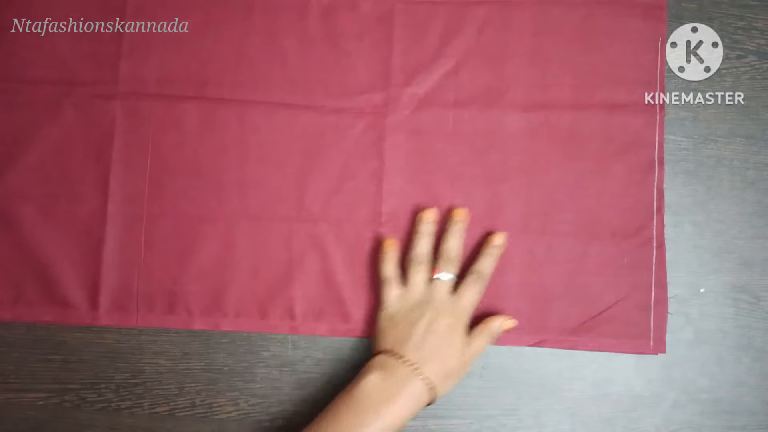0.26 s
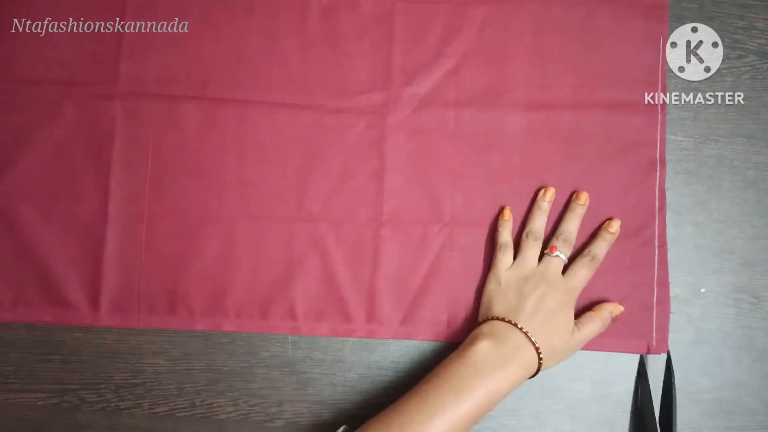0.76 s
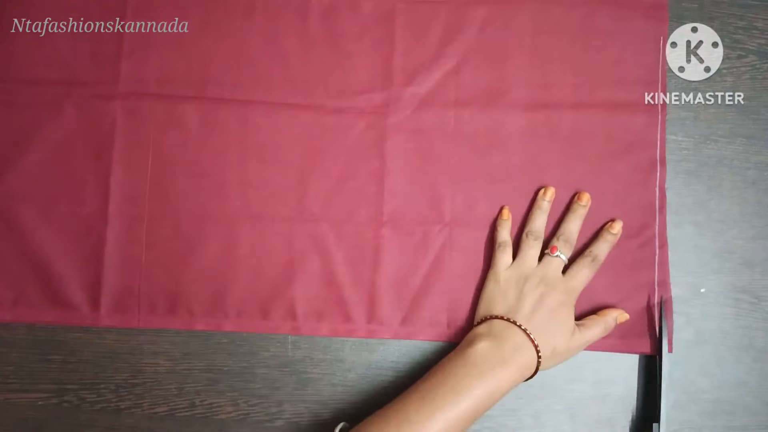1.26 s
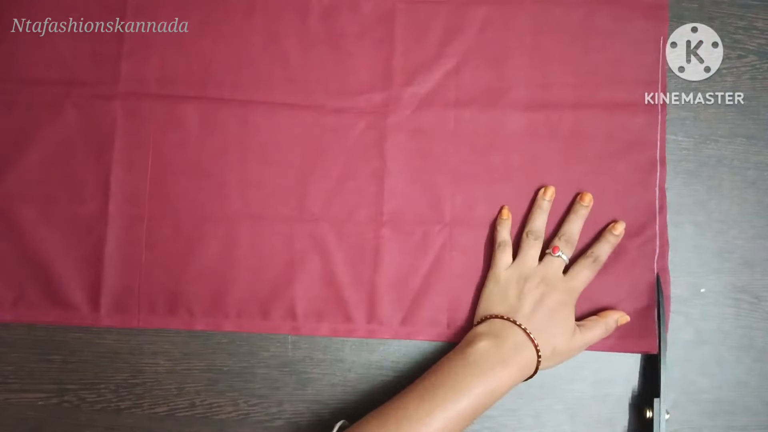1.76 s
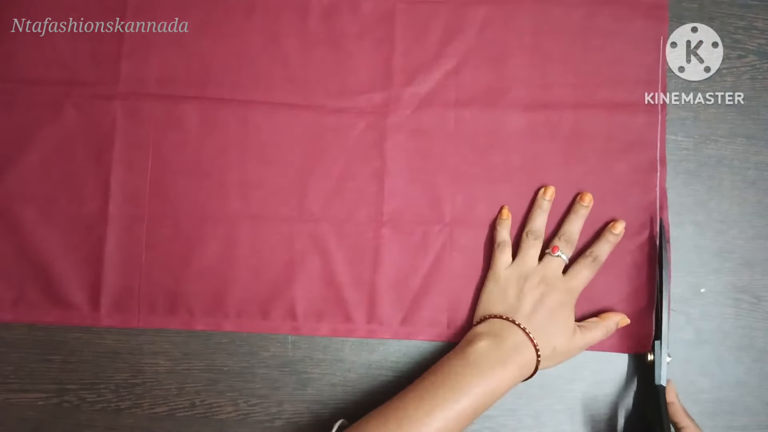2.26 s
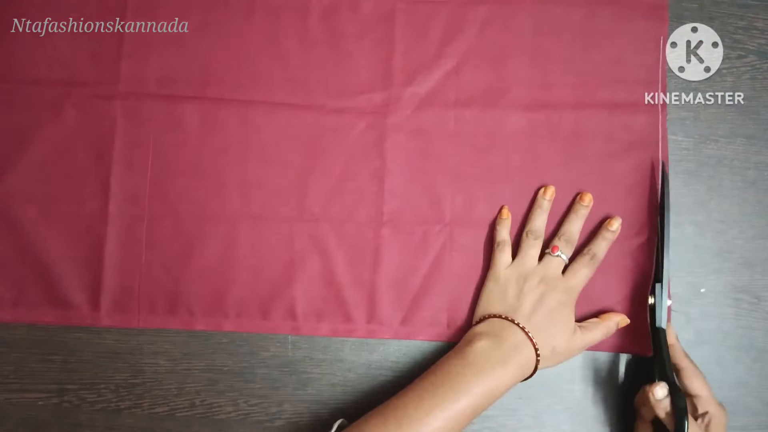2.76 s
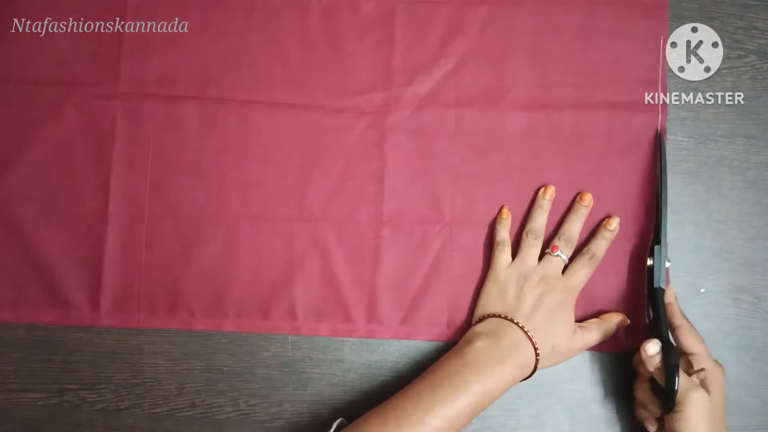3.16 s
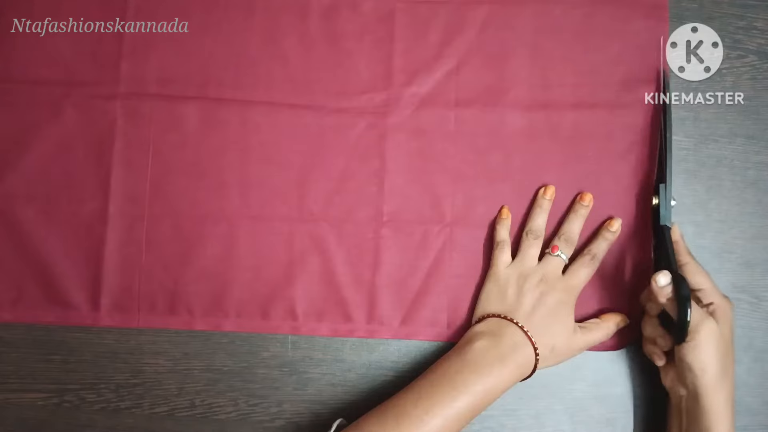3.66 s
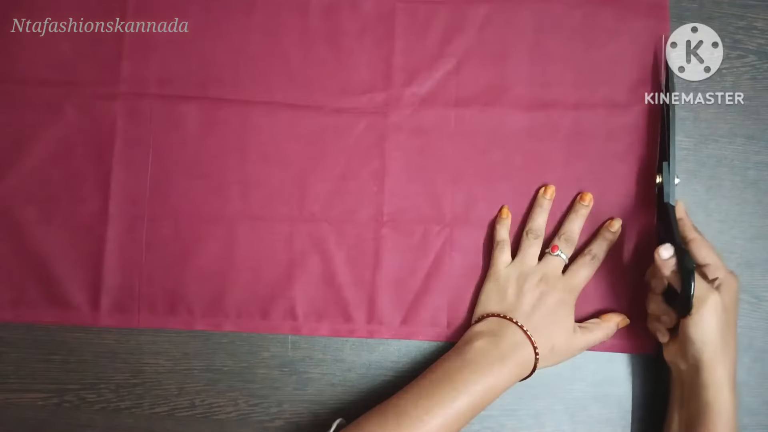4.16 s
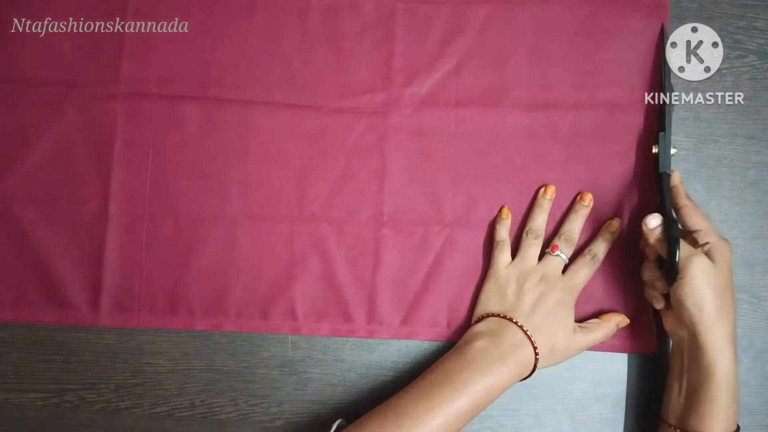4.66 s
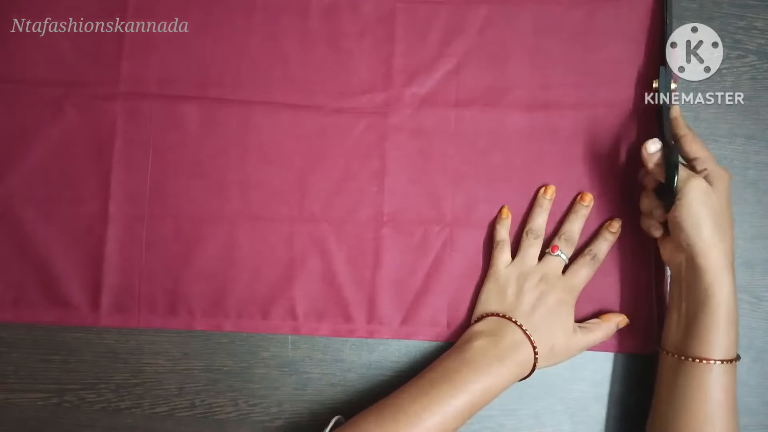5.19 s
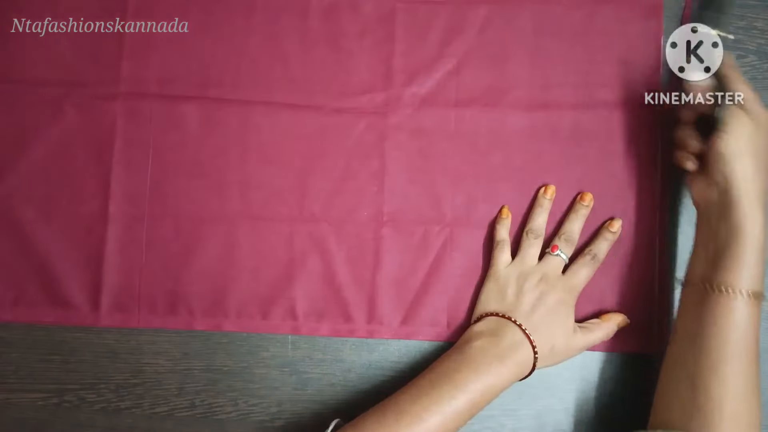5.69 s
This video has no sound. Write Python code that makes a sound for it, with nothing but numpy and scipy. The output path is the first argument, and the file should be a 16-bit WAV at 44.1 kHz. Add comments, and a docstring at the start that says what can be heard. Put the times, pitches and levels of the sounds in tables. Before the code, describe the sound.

Heavy steel shears clink sharply a few times, knock on a wooden table and slide with a short scrape and rustle under cloth. After a brief pause they cut along the edge, about fifteen even crunching snips, each with a bright thread rasp and a soft rub as the blades reopen. Ends with a small metallic scrape. Close stereo microphones, small hard-walled room, faint hush.

```python
"""Tailor's shears cutting cloth on a table

Heavy shears clink as they are picked up, are set on a table and slid under a sheet of cloth, then cut
along its edge in a small, hard-walled room, before a microphone pair. Clinks are decaying steel modes;
stick-slip snaps drive the resonances of table and blades; parting threads give a bright rasp, the
dragging handle short wavering groans. Each closing stroke crunches, each opening rubs softly."""
import sys
import numpy as np
from scipy import signal
from scipy.fft import rfft, irfft
from scipy.io import wavfile
from scipy.ndimage import uniform_filter1d

SR = 44100
rng = np.random.default_rng(int(sys.argv[2]) if len(sys.argv) > 2 else 0)


def wav_out(sig):
    """Save sig, one row per channel (or a flat mono array), as 16-bit PCM at SR to the path in sys.argv[1]."""
    wavfile.write(sys.argv[1], SR, np.round(np.clip(np.atleast_2d(sig).T, -1, 1) * 32767).astype(np.int16))


N = 261745
TIME = np.arange(N) / SR

# Shears sliding over table and cloth. Each row: start in seconds, length in seconds, then the levels
# of table, blades and cloth in dB.
SLIDES = [(0.272, 0.1, -84, -59.5, -76), (0.411, 0.11, -83.5, -71, -74.5), (0.583, 0.012, -68, -94, -57.5),
          (0.64, 0.011, -76, -90, -85), (0.73, 0.057, -121, -104, -70.5), (0.808, 0.054, -54, -48.5, -44),
          (0.983, 0.044, -85, -87, -74.5), (1.092, 0.0064, -83.5, -67, -66.5),
          (1.286, 0.015, -85, -63.5, -62), (1.338, 0.051, -63, -52.5, -52), (1.556, 0.0075, -75, -51, -68),
          (1.925, 0.019, -63, -60, -53.5), (2.226, 0.032, -77, -71.5, -62.5),
          (4.594, 0.024, -74, -63.5, -61), (5.6, 0.016, -92, -71, -65), (5.714, 0.021, -50.5, -53.5, -55.5),
          (5.77, 0.021, -53, -48.5, -54), (5.813, 0.079, -62, -60.5, -105)]
# Cuts: the edges touch, bite through the cloth and open again. Each row: bite in seconds, length in
# seconds, blade body in dB, blade ring in dB, touch in seconds before the bite, opening in seconds after it.
CUTS = [(1.41, 0.057, -38, -42, 0.023, 0.14), (1.783, 0.054, -40.5, -42, 0.021, 0.12),
        (2.096, 0.066, -46, -45, 0.0066, 0.11), (2.385, 0.048, -44, -43, 0.01, .12),
        (2.672, 0.053, -44, -40.5, 0.0095, 0.14), (2.958, 0.056, -45, -43, 0.018, 0.12),
        (3.217, 0.063, -44, -43, 0.018, 0.13), (3.502, 0.051, -43, -40.5, 0.011, 0.12),
        (3.776, 0.05, -43.5, -39, 0.015, 0.12), (4.052, 0.034, -45, -42, 0.026, 0.1),
        (4.437, 0.049, -50.5, -41.5, 0.024, .115), (4.717, 0.067, -45, -41.5, 0.011, 0.13),
        (4.996, 0.047, -43.5, -40.5, .016, .11), (5.261, 0.04, -42, -44.5, 0.027, 0.11),
        (5.512, 0.037, -44, -44, 0.025, 0.089)]
# Spectrum of a steel crack and of sliding cloth. Each row: frequency in Hz, relative density in dB per Hz.
CRACK_SPECTRUM = [(100, -42), (300, -17), (540, -27.5), (750, -8), (1600, -9.5), (2800, 0), (4100, -0.5),
                  (5100, 4), (6800, -4.5), (10000, -4.5), (13000, -2), (16000, -2)]

# course of a movement: (attack s per 60 dB, sag while it lasts dB, release s per 60 dB)
SLIDE_COURSE = (0.07, 0, 0.036)
OPEN_COURSE = (0.074, 6.36, 0.1)
OPEN_S = 0.028  # length of each opening


def from_db(db):
    """Decibels to gain."""
    return 10 ** (np.asarray(db) / 20)


def at_hz(points, hz):
    """Read a table on a log-frequency axis."""
    f, value = np.transpose(points)
    return np.interp(np.log(np.maximum(hz, 1)), np.log(f), value)


def unit(response):
    """Scale a response to energy 1 per channel, averaged over the channels."""
    return response / np.sqrt(np.mean(np.sum(response ** 2, axis=-1)) + 1e-30)


def through(x, response):
    """Play x through an impulse response."""
    return signal.fftconvolve(np.atleast_2d(x), np.atleast_2d(response), axes=-1)[:, :N]


def colour(points, size=2048):
    """Causal (minimum-phase) response with the given spectrum."""
    cepstrum = irfft(np.log(from_db(at_hz(points, np.fft.rfftfreq(size, 1 / SR)))))
    # fold the cepstrum onto positive times
    cepstrum[1:size // 2] *= 2
    cepstrum[size // 2 + 1:] = 0
    return irfft(np.exp(rfft(cepstrum)))


def strokes(starts, lengths, levels_db, course):
    """Force of a set of movements: each rises, sags while it lasts and is released."""
    attack_s, sag_db, release_s = course
    power = np.zeros(N)
    for start, length, db in zip(*np.broadcast_arrays(starts, lengths, levels_db)):
        end = length + release_s
        near = slice(max(int((start - attack_s) * SR), 0), int((start + end) * SR))
        corners_s = [-attack_s, 0, length, end]
        shape_db = np.interp(TIME[near] - start, corners_s, [-60, 0, -sag_db, -sag_db - 60])
        power[near] += from_db(db + shape_db) ** 2
    return np.sqrt(power)


def handling(rows, course, axis):
    """Force of slides or bumps, with the levels of one column."""
    columns = np.transpose(rows)
    return strokes(columns[0], columns[1], columns[axis], course)


def cutting(touch_db, bite_db, open_db):
    """Force on one part through every cut: touch, closing stroke, opening."""
    bite_s, length, _, _, lead, reopen = np.transpose(CUTS)
    # the hand opens the blades more briskly as it gets going: 0.7 dB per second
    growth_db = 0.7 * (bite_s - bite_s.mean())
    touch = strokes(bite_s - lead, 0.017, touch_db, (0.03, 3.8, 0.096))
    crunch = strokes(bite_s, length, bite_db, (0.022, 5, 0.077))
    opening = strokes(bite_s + reopen, OPEN_S, open_db + growth_db, OPEN_COURSE)
    return touch + crunch + opening


def grains(per_s, spread_db, even_s=.012):
    """Tiny snaps of uneven size over faint noise; their power is even over longer stretches."""
    sizes = from_db(spread_db * np.minimum(rng.exponential(1, N), 4)) * rng.choice([-1, 1], N)
    snaps = sizes * (rng.random(N) < per_s / SR) + 0.037 * rng.standard_normal(N)
    return snaps / np.sqrt(uniform_filter1d(snaps ** 2, int(even_s * SR) + 1) + 1e-9)


def taps(rows, axis, length_s):
    """One click a row, with the energy that its level has over length_s."""
    out = np.zeros(N)
    for row in rows:
        out[max(round(row[0] * SR), 0)] += from_db(row[axis]) * np.sqrt(length_s * SR)
    return out


def struck(modes):
    """Free ringing after one blow: decaying modes of random sign; thin steel radiates no bass."""
    t = TIME[:SR // 2]
    rings = 0
    for hz, db, t60 in modes:
        decay = from_db(db - 60 * t / t60)
        rings = rings + rng.choice([-1, 1]) * decay * np.cos(2 * np.pi * hz * t)
    no_bass = signal.butter(2, modes[0][0] / 2, "high", fs=SR, output="sos")
    return unit(signal.sosfilt(no_bass, rings))


def body(force, modes, wander_db, wander_s=.1):
    """Resonances whose shares wander as the point of contact travels; dark below and above them."""
    t = TIME[:SR // 2]
    rings = []
    for k, (hz, width, db) in enumerate(modes):
        decay = from_db(db) * width * np.exp(-np.pi * width * t)
        rings.append((-1) ** k * decay * np.cos(2 * np.pi * hz * t))
    edges_hz = [modes[0][0] * 0.63, modes[-1][0] * 1.04]
    rings = signal.sosfilt(signal.butter(3, edges_hz, "band", fs=SR, output="sos"), rings)
    knots = rng.standard_normal((len(modes), 256))
    shares = np.array([from_db(wander_db * np.interp(TIME / wander_s, np.arange(len(k)), k)) for k in knots])
    shares /= np.sqrt(np.mean(shares ** 2, axis=0))
    whole = rings.sum(axis=0)
    scale = np.linalg.norm(whole)
    return through(force * shares, rings / scale).sum(axis=0), whole / scale


def friction(force, modes, per_s, spread_db, even_s, wander_db):
    """Stick-slip snaps drive a body; the steady hand keeps its vibration near the level of the stroke."""
    shaken, response = body(force * grains(per_s, spread_db), modes, wander_db)
    steady = np.abs(through(force ** 2, response ** 2)[0])
    window = np.hanning(int(even_s * SR) + 3)
    powers = np.array([steady, shaken ** 2])
    expected, actual = np.abs(signal.fftconvolve(powers, window[None], "same", axes=-1)) + 1e-12
    return shaken * np.sqrt(expected / actual)


def room(wet_db, early_t60, late_db):
    """Direct sound, a quick cloud of near reflections and a longer tail; width varies with frequency."""
    # Width at the microphone pair. Each row: frequency in Hz, side against mid in dB.
    side_to_mid = [(100, -0.5), (250, -8), (500, -3.5), (1200, -3), (2300, 2), (15000, -1.5)]
    # Decay of the late tail. Each row: frequency in Hz, time to fall by 60 dB in seconds.
    late_t60 = [(150, 0.78), (1000, 0.22), (4000, 0.38), (9000, 0.33), (15000, 0.32)]
    t = TIME[:SR // 2]
    hz = np.fft.rfftfreq(len(t), 1 / SR)
    mid, side = rfft(rng.standard_normal((2, len(t))))
    width = from_db(at_hz(side_to_mid, hz))
    field = (mid + width * side * [[1], [-1]]) / np.sqrt(1 + width ** 2)
    edges = [0, 500, 1500, 3500, 7000, 11000, SR]
    tail = 0
    for low, high in zip(edges, edges[1:]):
        early = from_db(-60 * t / early_t60)
        late = from_db(late_db - 60 * t / at_hz(late_t60, (low + high) / 2))
        tail = tail + irfft(field * ((hz >= low) & (hz < high)), len(t)) * (early + late)
    response = from_db(wet_db) * unit(tail * np.clip(t / 0.0024, 0, 1))
    response[:, 0] += 1  # direct sound
    return unit(response)


def in_room(x, wet_db, early_t60, late_db, count=4):
    """The shears keep moving, so the sound crossfades round a few patterns of reflections."""
    out, travel = 0, TIME / .27  # one pattern every 0.27 s
    for k in range(count):
        away = np.abs((travel - k + count / 2) % count - count / 2)
        share = np.sqrt(np.clip(1.5 - 2 * away, 0, 1))
        out = out + through(x * share, room(wet_db, early_t60, late_db))
    return out


def hush():
    """Faint steady background: independent coloured noise on left and right."""
    # Each row: frequency in Hz, relative density in dB per Hz.
    hush_spectrum = [(20, 6), (50, -2), (120, -7), (250, -6.5), (1000, -10.5), (3000, -17), (15000, -25)]
    return from_db(-83) * through(rng.standard_normal((2, N)), unit(colour(hush_spectrum)))


def clinks():
    """Steel meets steel: a crack, a dying chatter of the loose joint, and the ring of blades and handles."""
    # Each row: start in seconds, level in dB, top of the contact's spectrum in Hz, handle clank in dB,
    # free ring against the crack in dB.
    contacts = [(.001, -87.5, 2956, -64, -11), (0.1605, -22.5, 5420, -45, -7),
                (.1962, -23, 15000, -46.5, -7), (.203, -34, 12990, -55.5, -8.5),
                (.227, -24.5, 6000, -44, -10), (.511, -25.5, 5940, -37, -39.5),
                (0.771, -40, 12200, -51, -27)]
    # Free ringing of the steel. Each row: frequency in Hz, relative level in dB, t60 in seconds.
    steel_modes = [(764.6, -9.5, 0.41), (850, -16, .45), (1372, -14.5, 0.35), (2691, -13, 0.21),
                   (3725, -4.5, .2), (3990, -6, .17), (4200, -7, .17), (4377, 5, 0.091), (4740, -7, 0.22),
                   (4660, -5, 0.13), (4870, 7, 0.073), (6100, -9, 0.14), (6137, -18.5, 0.29),
                   (7400, -7, 0.06), (9380, -8.5, .13)]
    # Clank of the handles. Each row: frequency in Hz, relative level in dB, t60 in seconds.
    handle_modes = [(714, -2, 0.17), (846, -10, .16), (1070, -16, .1), (1429, 7, 0.061), (1770, 1.5, 0.13),
                    (2036, 0, 0.056), (2210, -8.5, 0.057), (2760, -12.5, 0.072), (3197, -16, 0.071)]
    t, out = TIME[:SR // 2], 0
    for row in contacts:
        _, _, top_hz, _, ring_db = row
        chatter = from_db(-5) * unit(grains(per_s=640, spread_db=4)[:len(t)] * from_db(-60 * t / 0.15))
        chatter[0] += 1  # the first blow
        softness = signal.butter(2, min(top_hz, .45 * SR), fs=SR, output="sos")
        blow = through(taps([row], axis=1, length_s=0.0055), unit(chatter))
        contact = signal.sosfilt(softness, blow)
        crack = through(contact, unit(colour(CRACK_SPECTRUM)))
        ring = from_db(ring_db) * through(contact, struck(steel_modes))
        clank = through(taps([row], axis=3, length_s=0.017), struck(handle_modes))
        out = out + crack + ring + clank
    return through(out, room(wet_db=10.5, early_t60=0.069, late_db=-16.5))


def table():
    """The table top takes up every stroke and bump through the lower blade and handle."""
    # The lower handle bumps on the table. Each row: start in seconds, length in seconds,
    # table boom in dB, table wood in dB.
    bumps = [(.197, 0.13, -64, -73), (.511, 0.037, -44.5, -38), (.772, .028, -40.5, -43),
             (.865, 0.062, -70, -58), (1.475, 0.012, -50, -54), (1.935, 0.058, -63, -47),
             (1.98, 0.032, -43, -81), (2.575, 0.019, -49, -62)]
    # How firmly the lower blade bears on the table while cutting. Each row: time in seconds, firmness in dB.
    firmness = [(1.4, -5), (1.8, -4), (2.4, 1), (3.0, 6), (3.5, 4), (3.8, 1.5), (4.05, 4.5), (4.449, 1),
                (4.72, 2.5), (5, 0), (5.26, 0), (5.5, -1)]
    # Low and upper resonances. Each row: frequency in Hz, width in Hz, relative level in dB.
    boom_modes = [(148.4, 7.9, -10), (190, 6.7, -2.5), (232.7, 13.9, 0.5), (302.4, 36, -4), (313, 14, -0.5)]
    wood_modes = [(341.8, 17, -1), (435.8, 23, 4), (499, 74, -3.5), (555.4, 36, 0.5), (638.6, 56, 0.5),
                  (727, 110, -4), (803, 45, -1)]
    # Dull push of a stroke on the whole table. Each row: frequency in Hz, relative density in dB per Hz.
    thud_spectrum = [(20, -8), (35, -8.5), (60, -18.5), (110, -15.5), (250, -31.5), (1000, -76.5)]
    bump_course = (0.021, 15.3, .03)
    boom_follows, opening_follows = 0.33, 0.41  # share of the bearing's swing
    bearing = np.interp(np.transpose(CUTS)[0], *np.transpose(firmness))
    slide = handling(SLIDES, SLIDE_COURSE, axis=2)
    boom_force = cutting(touch_db=-67, bite_db=-49.5 + boom_follows * bearing,
                         open_db=-58.5 + opening_follows * bearing)
    wood_force = cutting(touch_db=-49.5 + bearing, bite_db=-46.5 + bearing,
                         open_db=-56 + opening_follows * bearing)
    boom_force = boom_force + from_db(-0.5) * slide + handling(bumps, bump_course, axis=2)
    wood_force = wood_force + slide + handling(bumps, bump_course, axis=3)
    boom = friction(boom_force, boom_modes, per_s=450, spread_db=-2, even_s=0.095, wander_db=-0.5)
    wood = friction(wood_force, wood_modes, per_s=380, spread_db=8.5, even_s=0.13, wander_db=4.0)
    push = boom_force * rng.standard_normal(N)
    thud = from_db(-25.5) * through(push, unit(colour(thud_spectrum, size=8192)))
    return thud + in_room(boom + wood, wet_db=-5.5, early_t60=0.1, late_db=-23)


def blades():
    """The edges meet, grind past each other, jump now and then, and rub on opening."""
    # The edges catch hard and jump. Each row: time in seconds, blade body in dB, blade ring in dB.
    catches = [(1.41, -34.5, -54), (1.763, -46, -59), (1.815, -34, -36), (2.984, -38, -31.5),
               (4.054, -45, -28.5), (4.996, -39, -51), (5.264, -43, -56), (5.548, -68, -42.5),
               (5.716, -42, -39.5)]
    # Low and high blade resonances. Each row: frequency in Hz, width in Hz, relative level in dB.
    body_modes = [(865, 62, -1.5), (994, 102, 4), (1110, 86, -2.5), (1229, 68, -1.5), (1423, 64, -5),
                  (1585, 170, -15.5)]
    ring_modes = [(1780, 180, -15), (2138, 160, -2), (2351, 198, -0.5), (2537, 162, -7), (2754, 340, -18.5)]
    bite_s, _, body_db, ring_db, _, _ = np.transpose(CUTS)
    slide_s, slide_length, _, steel_db, cloth_db = np.transpose(SLIDES)
    # the ring of a slide lies part of the way from its blade level to its cloth level
    slide_ring_db = steel_db + 0.39 * (cloth_db - steel_db)
    low_force = cutting(touch_db=-54.5, bite_db=body_db, open_db=-59)
    low_force = low_force + strokes(slide_s, slide_length, steel_db, SLIDE_COURSE)
    high_force = cutting(touch_db=-53.5, bite_db=ring_db, open_db=-55.5)
    high_force = high_force + strokes(slide_s, slide_length, slide_ring_db, SLIDE_COURSE)
    low = friction(low_force, body_modes, per_s=300, spread_db=12.0, even_s=0.041, wander_db=2.0)
    high = friction(high_force, ring_modes, per_s=300, spread_db=0.5, even_s=0.024, wander_db=5.5)
    # each cut also starts with a snap, levelled against its stroke
    snaps = list(catches) + list(zip(bite_s + 0.00291, body_db + 5.5, ring_db - 11))
    low = low + body(taps(snaps, axis=1, length_s=.005), body_modes, wander_db=2)[0]
    high = high + body(taps(snaps, axis=2, length_s=.005), ring_modes, wander_db=2)[0]
    low = in_room(low, wet_db=5.5, early_t60=0.07, late_db=-26.5)
    return low + in_room(high, wet_db=9.0, early_t60=0.087, late_db=-32.0)


def threads():
    """Threads part one after another in a fine bright rasp at the edges; sliding cloth hisses more densely."""
    # Bright resonances of the cutting edges, driven by parting threads. Each row: frequency in Hz,
    # width in Hz, relative level in dB.
    edge_modes = [(4090, 810, -3.5), (4970, 820, 0), (7000, 1720, -7), (9000, 565, 5), (10690, 1030, -3),
                  (12200, 840, -6.5), (14700, 420, -0.5)]
    bite_s, length, _, _, _, reopen = np.transpose(CUTS)
    lag_s = 0.0051  # the threads start to part just after the bite
    force = strokes(bite_s + lag_s, length - lag_s, -46, (0.067, 1.5, 0.074))
    force = force + strokes(bite_s + reopen, OPEN_S, -74.5, OPEN_COURSE)
    cut = force * grains(per_s=500, spread_db=7.5)
    slide = handling(SLIDES, SLIDE_COURSE, axis=4) * grains(per_s=1100, spread_db=3.5)
    rasp = body(cut + from_db(-7.0) * slide, edge_modes, wander_db=0.63)[0]
    rasp = rasp + through(slide, unit(colour(CRACK_SPECTRUM)))
    return in_room(rasp, wet_db=14.5, early_t60=0.1, late_db=-22.0)


def groans(rise_s=0.0086, t60=0.16, waver=0.047):
    """The dragging handle sticks and slips and sets one resonance singing: wavering tones that ring out."""
    # Each row: start in seconds, length in seconds, pitch in Hz, level in dB.
    tones = [(0.535, 0.018, 236.6, -45.5), (0.556, 0.05, 432.4, -57.5), (0.812, 0.032, 225, -55),
             (0.848, 0.041, 443.4, -50), (1.095, 0.073, 646, -71), (1.458, 0.079, 236.9, -58.5),
             (1.935, 0.02, 364, -43), (1.936, 0.012, 745, -49), (1.951, 0.01, 550, -44.5),
             (1.983, 0.019, 230.5, -60), (2.601, 0.018, 234.4, -48.5), (2.861, 0.03, 234, -52.5),
             (3.3, 0.015, 234, -52), (5.765, 0.042, 443, -49.5)]
    out = np.zeros(N)
    for start, length, hz, db in tones:
        t = TIME - start
        level = np.clip(t / rise_s + .5, 0, 1) * from_db(db - 60 * np.clip(t - length, 0, 1) / t60)
        drift = np.interp(t, np.linspace(0, .2, num=20), rng.standard_normal(20))
        pitch = hz * (1 + waver * drift)
        out += np.sqrt(2) * level * np.sin(2 * np.pi * np.cumsum(pitch) / SR)
    return through(out, room(wet_db=-16.5, early_t60=0.083, late_db=-38))


def scene():
    """Shears, cloth and table a little to the left in the treble, over a faint hush."""
    # Balance of the microphone pair. Each row: frequency in Hz, left minus right in dB.
    left_right = [(200, -0.5), (700, 1.5), (1300, 0), (2400, 0.5), (4400, 1), (7500, 2.5), (9200, 4),
                  (11500, 7), (15000, 0.5)]
    background = hush()
    sound = clinks() + table() + blades() + threads() + groans()
    sides = [colour([(hz, sign * db / 2) for hz, db in left_right]) for sign in (1, -1)]
    return through(sound, np.array(sides)) + background


def record(dry):
    """The top is cut steeply above 15.8 kHz."""
    return signal.sosfilt(signal.ellip(10, .2, 80, 15800, fs=SR, output="sos"), dry)


dry = scene()
out = record(dry)
wav_out(out)
```